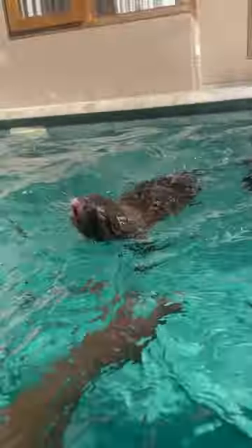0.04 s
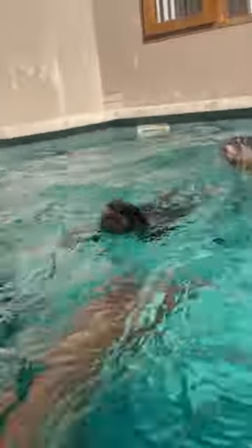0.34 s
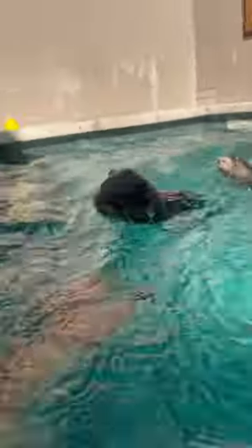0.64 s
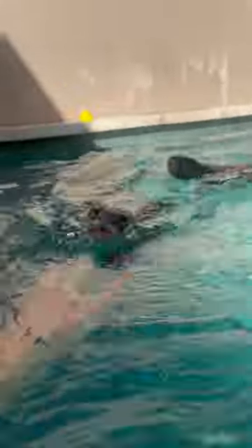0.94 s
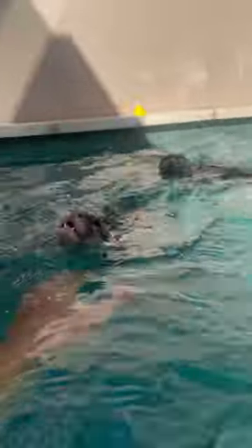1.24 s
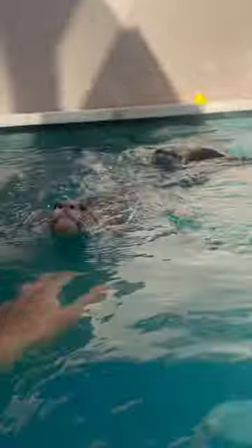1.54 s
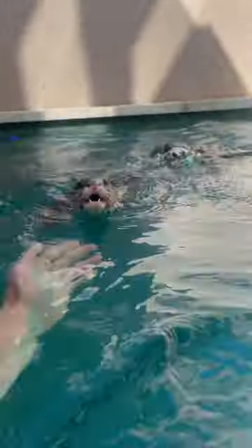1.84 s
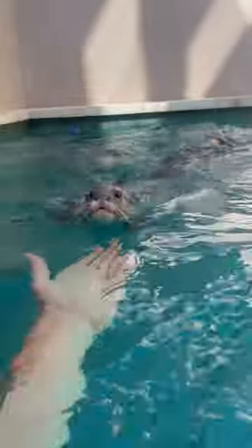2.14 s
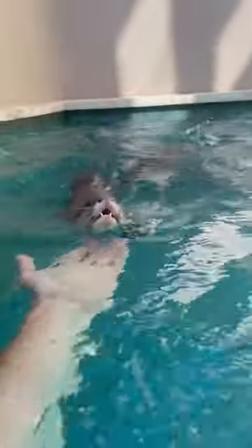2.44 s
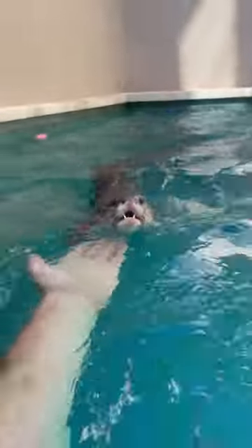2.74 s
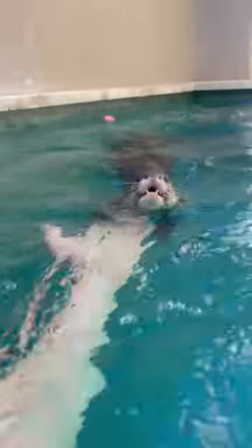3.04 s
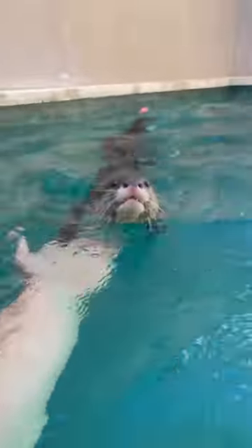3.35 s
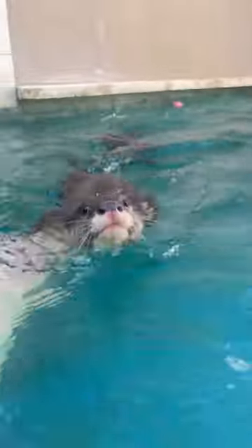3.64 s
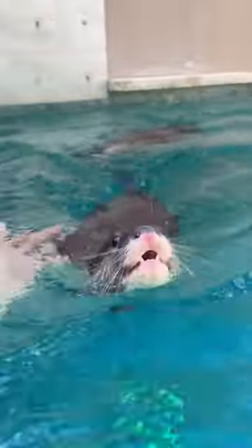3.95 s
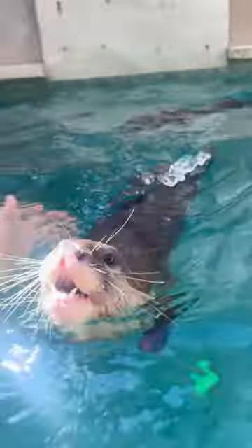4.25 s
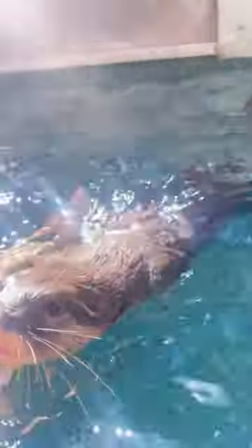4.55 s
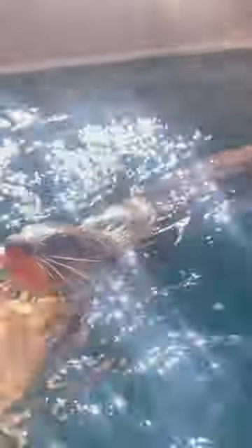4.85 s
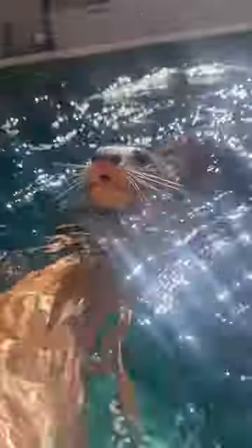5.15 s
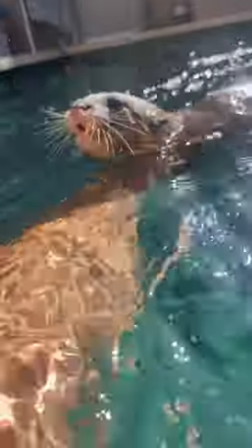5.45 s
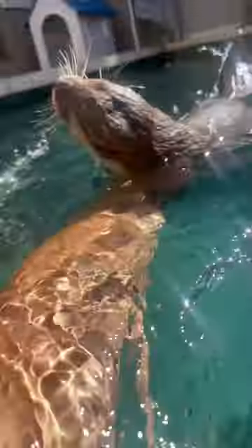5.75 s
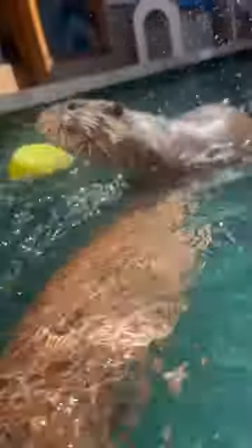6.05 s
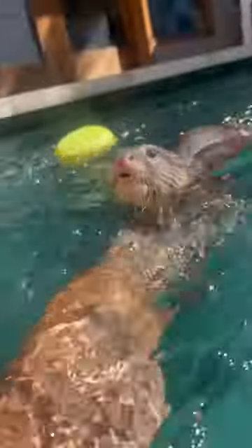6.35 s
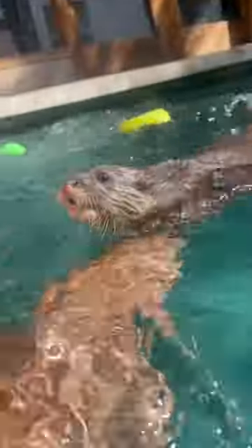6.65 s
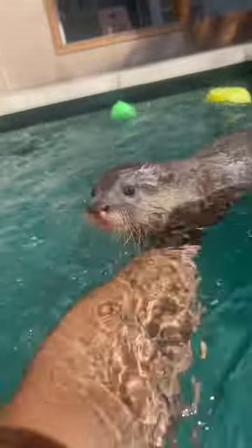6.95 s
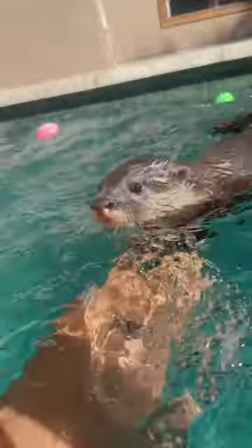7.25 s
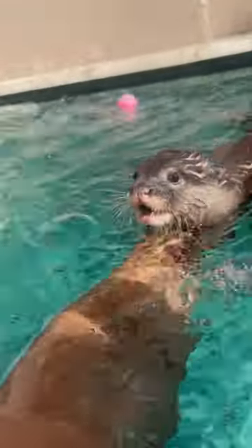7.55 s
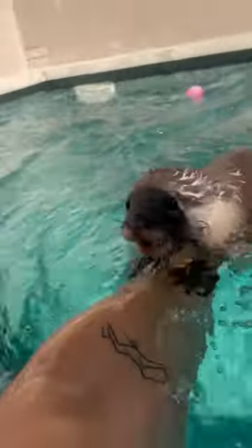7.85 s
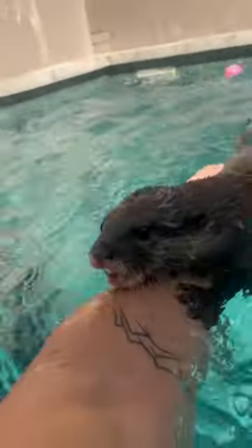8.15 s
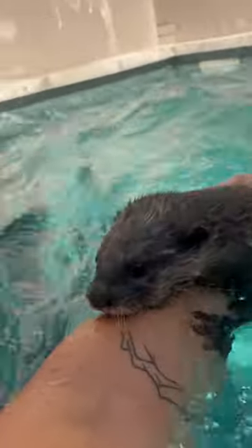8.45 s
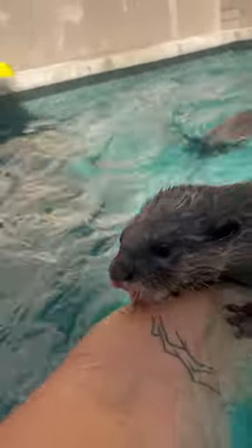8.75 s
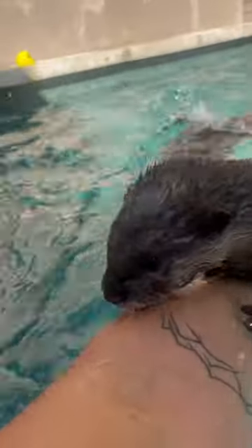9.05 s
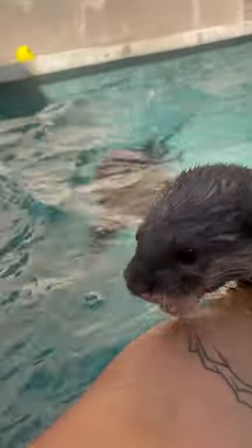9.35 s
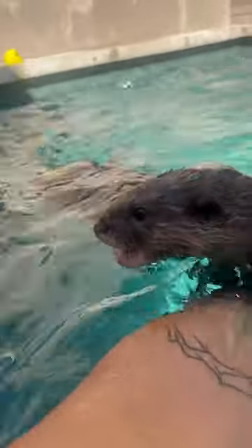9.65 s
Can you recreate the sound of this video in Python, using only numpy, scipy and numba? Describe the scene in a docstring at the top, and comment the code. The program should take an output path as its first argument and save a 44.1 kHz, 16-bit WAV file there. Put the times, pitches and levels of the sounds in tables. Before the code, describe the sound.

An otter gives repeated loud, nasal wails and harsh squeals close by in a pool, with faint lapping and drips between calls.

```python
"""An otter begs close by in a walled swimming pool. One wail is just ending; water laps, bubbles and drips,
and a second wail follows, its vocal-fold pulses ringing the resonances of the throat. A faint hum comes
and goes. Five more calls each leap up into a whistle, break down into a nasal wail near 750 Hz and fray
into a harsh scream as the folds lose their rhythm; squeals burst from the third. Spray fizzes up toward
the end. Throughout, the moving water and the walls reflect the sound."""
import sys
import numpy as np
from scipy import signal
from scipy.fft import rfft, irfft, next_fast_len
from scipy.io import wavfile
from scipy.ndimage import uniform_filter1d, map_coordinates
from numba import njit

SR = 44100
rng = np.random.default_rng(int(sys.argv[2]) if len(sys.argv) > 2 else 0)


def transcribe(u):
    """Save the signal u as a 16-bit wav file named by the first command-line argument.

    u: samples, shape (n,) or (channels, n), limited to [-1, 1]; the rate is SR.
    q: integer samples, one column per channel.
    """
    v = np.clip(np.atleast_2d(u).T, -1, 1)
    q = np.round(v * 32767).astype(np.int16)
    wavfile.write(sys.argv[1], SR, q)


N = 427769
T = np.arange(N) / SR
CUTOFF_HZ = 15800


def from_db(db):
    """Decibels to amplitude ratio."""
    return 10 ** (np.asarray(db) / 20)


def rms_one(x):
    """Normalisation to rms 1."""
    return x / np.sqrt(np.mean(x ** 2) + 1e-20)


def evened(x, span_s=0.017):
    """Envelope division: holds the short-term rms at 1, keeping the grain."""
    size = max(int(span_s * SR), 8)
    power = uniform_filter1d(uniform_filter1d(x * x, size), size)
    return x / np.sqrt(np.abs(power) + 1e-12)


def in_time(rows):
    """Linear interpolation of a table's columns at every sample."""
    s, *columns = np.transpose(sorted(map(tuple, rows)))
    return [np.interp(T, s, c) for c in columns]


def at_hz(points, hz):
    """Interpolation of a spectrum on a log-frequency axis."""
    f, value = np.transpose(points)
    return np.interp(np.log(np.maximum(hz, 1)), np.log(f), value)


def gate(start, end, attack_s, release_s):
    """Trapezoidal envelope: 1 from start to end, fading to 0 around it."""
    return np.clip(np.minimum((T - start) / attack_s, (end - T) / release_s) + 1, 0, 1)


def swell(s, half_s, squareness=4):
    """Super-Gaussian envelope: a rounded hump of height 1 around a moment."""
    return np.exp(-np.minimum(np.abs(T - s) / half_s, 6) ** squareness)


def cut(x, hz, kind, order=2):
    """Butterworth filter."""
    sections = signal.butter(order, np.minimum(hz, SR / 2 - 1), kind, fs=SR, output="sos")
    return signal.sosfilt(sections, x)


def drift(rate):
    """Smooth random modulation of rms 1, changing `rate` times a second."""
    return rms_one(map_coordinates(rng.standard_normal(N // 10), [T * rate], order=2, mode="wrap"))


@njit
def two_pole(x, a1, a2):
    """The difference equation of a damped resonator."""
    y = np.zeros(len(x))
    for i in range(2, len(x)):
        y[i] = (1 - a2) / 2 * (x[i] - x[i - 2]) + a1[i] * y[i - 1] - a2 * y[i - 2]
    return y


def resonate(x, hz, width_hz):
    """Band-pass resonance with peak gain 1; hz may move."""
    r = np.exp(-np.pi * width_hz / SR)
    return two_pole(x, 2 * r * np.cos(2 * np.pi * hz / SR) * np.ones(N), r * r)


def formant(x, modes, wander=0.012):
    """Parallel resonances (centre Hz, width Hz, dB) wander as tongue and lips move; even level."""
    return evened(sum(from_db(db) * resonate(x, hz * (1 + wander * drift(9)), width)
                      for hz, width, db in modes))


def folds(pitch, rough, quiver, jitter=0.16, shimmer_db=-1.0, graze_db=-11, rasp=0.54, puff_s=0.0011):
    """Glottal source: a pulse per closure, with jitter, shimmer and hiss when rough; and a sine swing."""
    wobble = 1 + 0.00347 * drift(110) + rough * 0.035 * drift(90) + quiver * drift(36)
    cycles = np.cumsum(pitch * wobble) / SR
    samples = np.arange(N)
    closures = np.interp(np.arange(1, int(cycles[-1])), cycles, samples)
    wild = np.interp(closures, samples, rough)
    period = SR / np.interp(closures, samples, pitch)
    slip, shimmer = rng.standard_normal((2, len(closures)))
    closures = np.clip(closures + jitter * wild ** 2 * slip * period, 10, N - 10)
    grazes = rng.random(len(closures)) < 0.7 * (wild - 0.2)   # below 0.2 the folds always close fully
    force = from_db(shimmer_db * wild * np.minimum(shimmer, 1) + graze_db * grazes)
    pulses = np.zeros(N)
    for tap in range(-8, 9):   # a windowed sinc places each pulse between samples
        index = closures.astype(int) + tap
        offset = index - closures
        np.add.at(pulses, index, force * np.sinc(offset) * np.cos(offset * np.pi / 18) ** 2)
    puffs = signal.lfilter([1], [1, -np.exp(-1 / (puff_s * SR))], pulses)
    hiss = rasp * rough * evened(puffs * rng.standard_normal(N))
    return evened(pulses) + hiss, np.sqrt(2) * np.sin(2 * np.pi * cycles)


# Short rasps within wails. Each row: centre and half-length in seconds, roughness from 0 to 1.
WAIL_RASPS = [(1.005, 0.04, 0.7), (1.102, 0.011, 0.6), (1.192, 0.018, 0.6), (1.353, 0.02, 0.5),
              (4.135, .025, .32), (4.39, .03, .95), (7.83, .03, .7)]


def roughness(fray_at, clear, frayed, squeal, squeal_rough, fray_s=0.047, break_rough=0.22, flip=0.443):
    """Aperiodic vibration: a wail holds its tone, then frays; half-rough folds flip from tone to rasp."""
    rough = clear + (frayed - clear) * np.clip((T - fray_at) / fray_s + .5, 0, 1)
    rasps = [amount * swell(s, half_s) for s, half_s, amount in WAIL_RASPS]
    rough = np.max([rough, break_rough * np.sqrt(after_break()), *rasps], axis=0)
    rough = np.clip(rough + (squeal_rough - rough) * squeal, 0, 1)
    return np.clip(rough + flip * rough * (1 - rough) * drift(24), 0, 1)


# Throat shapes. Each row: time in seconds, second resonance in Hz and its level in dB, third resonance
# in Hz and its level in dB, fourth resonance in Hz, chest level in dB, nose level in dB (all relative).
THROAT_SHAPES = [(0.04, 3900, -2.5, 6600, -1.5, 9900, -18, -21),
                 (0.55, 3880, 13, 6800, 11.5, 10900, -5.5, 4),
                 (1.15, 4150, -9.5, 6950, -7.5, 9130, -15.5, -12),
                 (2.0, 4360, 2.5, 6250, -8, 9800, -16.5, -16), (2.25, 3600, 6.5, 6300, 3, 10960, -23, 1.5),
                 (2.65, 4240, 0.5, 6540, -9.5, 9300, -19, -16), (3.05, 4200, 5, 6300, 2, 8500, -12, -8.5),
                 (3.27, 3645, -10, 6900, -2.5, 8640, -13.5, -19.5),
                 (4.09, 3850, -7, 6760, -3, 10600, -8, -9), (4.19, 4530, -19, 6440, 5.5, 9350, -8.5, -13),
                 (4.25, 4260, -37, 6700, 2.5, 9400, -10.5, -14),
                 (4.45, 4160, -5, 6500, 1.5, 10140, -5.5, -7),
                 (5.55, 4870, -7, 6980, -3.5, 9830, -19.5, -18),
                 (5.88, 4140, 3, 7300, -7.5, 9100, -20.5, -17), (6.4, 3820, -7.5, 6630, -6, 9000, -11, -11),
                 (7.7, 4670, -24, 7214, 11, 10490, -11, -3), (8.05, 5060, 4.5, 6750, 0, 9860, -15, -10.5),
                 (8.6, 5176, 5.5, 6700, -1, 10100, -20.5, -21.5), (8.72, 5040, 21, 6370, 15, 9850, -4, 6),
                 (8.98, 4640, 23, 6070, 23.5, 9800, -3, 6.5), (9.15, 5060, 4.5, 6320, 4, 10030, -22, -21.5),
                 (9.45, 5600, 5.5, 6800, 1.5, 9950, -24, -10), (9.62, 5060, -8, 6150, 1.5, 9500, -18, -14)]
# The double fourth resonance. Each row: ratio to its centre frequency, width in Hz, relative level in dB.
FOURTH_MODES = [(1.001, 900, 0), (1.12, 1500, -1.5)]


def throat(source, airy, swing, jaw_hz, first_db, effort_db, bright_db, first_width_hz=370, treble_db=4):
    """Formant filtering: throat and nose ring over a chest tone; effort lifts resonances two and three."""
    second_hz, second_db, third_hz, third_db, fourth_hz, chest_db, nose_db = in_time(THROAT_SHAPES)
    open_db = 1.22 * (effort_db + 26)   # the usual effort is -26 dB
    peak_and_shoulder = [(jaw_hz, first_width_hz, 0), (0.85 * jaw_hz, 4.5 * first_width_hz, -15)]
    first = from_db(first_db) * formant(source, peak_and_shoulder)
    second = from_db(second_db + open_db) * formant(source, [(second_hz, 940, 0)])
    third = from_db(third_db + open_db) * formant(airy, [(third_hz, 710, 0)])
    nose = from_db(nose_db) * formant(source, [(1330, 1300, 0)])
    mouth = first - second - third + nose   # the upper resonances swing against the first
    # a valley between the first two resonances deepens as the second climbs
    valley_depth = np.clip((second_hz - 3970) / 900, 0, .9)
    mouth = mouth - valley_depth * resonate(mouth, hz=3386, width_hz=1300)
    hollow = resonate(mouth, 0.69 * jaw_hz, width_hz=330)   # side cavities swallow this band
    core = evened(mouth - hollow + from_db(chest_db) * swing)
    fourth = formant(airy, [(ratio * fourth_hz, width, db) for ratio, width, db in FOURTH_MODES])
    treble = np.minimum(from_db(bright_db), .92)
    return np.sqrt(1 - treble ** 2) * core - from_db(treble_db) * treble * fourth


# The wails. Each row: start, end and moment of fraying in seconds, roughness from 0 to 1 before and
# after that moment, quiver as a share of the pitch.
WAIL_SPANS = [(0, 0.075, 0.014, 0.3, 0.15, .005), (0.419, 1.36, 1.2, 0.11, 0.15, .008),
              (1.878, 3.274, 2.85, 0.09, 0.72, .004), (3.853, 4.637, 4.23, .12, 0.7, .01),
              (5.335, 6, 5.48, .26, 0.62, .02), (6.01, 6.739, 6.4, 0.74, 0.78, .03),
              (7.48, 8.202, 7.92, .4, 0.79, .022), (8.56, 9.701, 9.04, 0.29, 0.78, .022)]
# Pitch on which the voice settles, one list per call. Each row: time in seconds, pitch in Hz.
WAIL_PITCH = [
    [(0, 818), (.075, 775.5)],
    [(0.42, 907.2), (0.48, 832.4), (0.582, 821), (0.686, 755.6), (0.874, 751.4), (0.958, 803.6),
     (0.976, 844.6), (1.086, 826), (1.094, 795.2), (1.192, 788.6), (1.2, 820.5), (1.244, 785.4),
     (1.346, 797.8), (1.36, 839.2)],
    [(2.12, 746), (2.19, 726.1), (2.23, 749.5), (2.32, 738), (2.4, 793), (2.44, 739), (2.48, 767.3),
     (2.58, 744), (2.65, 785.7), (2.73, 746.7), (2.83, 772), (3.28, 773.2)],
    [(3.85, 692.3), (4.07, 694.7), (4.3, 765.4), (4.635, 733)],
    [(5.35, 700.6), (5.75, 770.6), (5.97, 830.4), (6.09, 603.2), (6.74, 618.5)],
    [(7.57, 679.4), (7.66, 694.7), (8.205, 668.2)],
    [(8.62, 642.8), (8.65, 718.5), (8.73, 662.4), (8.76, 706), (8.87, 655.6), (8.92, 698), (8.95, 641.5),
     (9.02, 629), (9.7, 711.4)],
]
# Effort and mouth opening, one list per wail after the first. Each row: time in seconds, effort in dB,
# first resonance in Hz, relative treble level in dB.
WAIL_COURSE = [
    [(0.42, -34, 2220, -10), (0.478, -40, 2710, -4), (0.744, -29.5, 2170, -1), (0.798, -30, 2480, 8),
     (0.864, -32.5, 2200, -8.5), (0.954, -25, 2640, -14.5), (1.0, -30.5, 2130, -14),
     (1.06, -27.5, 2800, -7.5), (1.118, -28, 2350, -5.5), (1.308, -25, 2480, -1), (1.355, -26, 2400, -9.5)],
    [(1.88, -24, 2450, -6), (1.914, -25, 2850, -4), (2.038, -29, 2330, 1), (2.154, -32, 2420, -13.5),
     (2.25, -27.5, 2260, -7.5), (2.366, -30.5, 2660, -10.5), (2.428, -24, 2270, -14),
     (2.638, -23.5, 2630, -4.5), (2.912, -26.5, 2330, -17.5), (3.142, -24, 2400, -10.5),
     (3.27, -27, 2450, -5)],
    [(3.86, -29, 1840, -2), (3.888, -27.5, 2040, -1.5), (3.962, -29, 2130, -6.5), (4.074, -27, 2330, 0.5),
     (4.144, -23.5, 2220, -11), (4.2, -18.5, 2420, -7.5), (4.22, -25, 2320, -8), (4.272, -22, 2600, -5.5),
     (4.372, -31.5, 2160, -5.5), (4.442, -26, 2110, -1.5), (4.625, -33.5, 2030, -8)],
    [(5.35, -29.5, 2210, -9), (5.41, -36, 2600, -6), (5.506, -29.5, 2600, -5.5), (5.644, -27.5, 2900, -7),
     (5.7, -32, 3080, -4)],
    [(6.03, -33, 2880, -6), (6.066, -36.5, 2800, -7), (6.096, -30.5, 2750, -14.5), (6.208, -27, 2390, -10),
     (6.44, -28, 2380, -8.5), (6.552, -32.5, 2310, -13), (6.598, -28, 2480, -16), (6.73, -32, 2400, -10.5)],
    [(7.49, -31.5, 2550, -2), (7.568, -40, 2666, -3), (7.644, -32.5, 2800, -0.5), (7.852, -28, 2590, -3),
     (7.91, -25.5, 2766, -0.5), (7.952, -33.5, 2380, -9), (7.978, -26.5, 2430, -2),
     (8.022, -29.5, 2470, -10.5), (8.092, -25.5, 2653, -7.5), (8.136, -31.5, 2522, -10),
     (8.195, -27, 2510, -7.5)],
    [(8.57, -24, 2680, -11), (8.6, -29, 2590, -8), (8.652, -33.5, 2714, -5), (8.76, -24.5, 2770, -6.5),
     (8.996, -35, 2573, -10), (9.106, -26.5, 2540, -12), (9.32, -23.5, 2600, -15.5),
     (9.478, -24.5, 2720, -7.5), (9.53, -24.5, 2640, -17), (9.618, -28.5, 2503, -3.5),
     (9.68, -22, 2675, -4.5)],
]


def wail(break_hz=1186.5, snarl_db=3, air_db=-17, level_db=0.5, throb_db=-0.36, fade_s=0.011):
    """Source and filter: fold pulses excite the throat; a rough voice hisses, snarls and throbs."""
    fray_at, clear, frayed, quiver = in_time(
        [(s, *settings) for start, end, *settings in WAIL_SPANS for s in (start, end)])
    opening = (WAIL_SPANS[0][1], -29.5, 2600, -9)   # the course row of the first wail
    effort_db, jaw_hz, bright_db = in_time([opening] + [row for rows in WAIL_COURSE for row in rows])
    held_hz, = in_time([row for rows in WAIL_PITCH for row in rows])
    squeal, squeal_db, squeal_pitch, squeal_hz, squeal_rough = squeals()
    rough = roughness(fray_at, clear, frayed, squeal, squeal_rough)
    pitch = held_hz + (break_hz - held_hz) * after_break() + (squeal_pitch - held_hz) * squeal
    pulses, swing = folds(pitch, rough, quiver)
    source = ripples(pulses)
    airy = source + from_db(air_db) * rough * rng.standard_normal(N)
    jaw_hz = jaw_hz + (squeal_hz - jaw_hz) * squeal
    first_db = 0.5 * squeal + snarl_db * rough
    voice = throat(source, airy, swing, jaw_hz, first_db, effort_db, bright_db)
    gain = from_db(level_db + effort_db + squeal * squeal_db + throb_db * rough * drift(170))
    sounding = np.max([gate(start, end, fade_s, fade_s) for start, end, *_ in WAIL_SPANS], axis=0)
    return cut(voice, 620, "high", order=4) * gain * sounding


def bubble_cloud(per_s, low_hz, high_hz, sharpness, spread_db):
    """Poisson excitation: small bubbles of 20 sizes ring at random moments; rms 1."""
    born = rng.random(N) < per_s / SR
    clicks = born * from_db(spread_db * np.minimum(rng.exponential(1, N), 4)) * rng.choice([-1, 1], N)
    size = rng.integers(0, 20, N)
    cloud = np.zeros(N)
    for k, hz in enumerate(np.geomspace(low_hz, high_hz, 20)):
        kicks = clicks * (size == k) + 1e-12 * (k + 1) * np.cos(T)   # the tiny term prevents underflow
        cloud += resonate(kicks, hz, hz / sharpness) / hz ** 0.19
    return rms_one(cloud)


# Spectrum of the wash. Each row: frequency in Hz, relative spectral density in dB.
WASH_SPECTRUM = [(25, -44), (55, 1), (95, -4), (170, 1), (350, -5.5), (600, -16), (2200, -20.5),
                 (4500, -37), (11000, -27), (13500, -14)]
# Low wash, stirred water and fine spray. Each row: time in seconds, relative level in dB.
WASH_LEVEL = [(0.0, -60.5), (3.21, -59.5), (7.05, -54), (9.32, -58)]
SLOSH_LEVEL = [(0, -54.5), (4.08, -65.5), (4.43, -44), (4.7, -58), (5.25, -38.5), (6.2, -55), (6.75, -51.5),
               (7.15, -57.5), (8.3, -64.5), (9.7, -49)]
SPRAY_LEVEL = [(0, -49.5), (3.6, -90.5), (5.1, -45.5), (6.9, -101), (9.7, -28)]


def lapping(wash_db=4.5, gurgle_db=-5, spray_db=-6, width=0.088):
    """Shaped noise and bubble resonance: a dull wash, low gurgles and a fizz of spray; mid and side."""
    size = next_fast_len(N)
    hz = np.fft.rfftfreq(size, 1 / SR)
    spectrum = rfft(rng.standard_normal((2, size))) * from_db(at_hz(WASH_SPECTRUM, hz)) * (hz > 20)
    mid, side = rms_one(irfft(spectrum, size)[:, :N])
    wash = from_db(wash_db + in_time(WASH_LEVEL)[0] + 2.0 * drift(22))
    slosh = from_db(gurgle_db + in_time(SLOSH_LEVEL)[0])
    spray = from_db(spray_db + in_time(SPRAY_LEVEL)[0])
    gurgle = slosh * bubble_cloud(300, low_hz=300, high_hz=1074, sharpness=14, spread_db=4.5)
    fizz = spray * bubble_cloud(900, low_hz=1000, high_hz=15000, sharpness=7, spread_db=4)
    return wash * mid + gurgle + fizz, width * wash * cut(side, 150, "high", order=1)


# Single bubbles and drips. Each row: start in seconds, relative level in dB, starting pitch in Hz.
BUBBLES = [(0.305, -45.5, 915), (1.672, -39.5, 1085), (3.302, -30, 696), (3.46, -47, 458),
           (3.739, -47, 1660), (4.359, -44, 724), (5.199, -39, 434), (6.871, -38, 1260),
           (7.265, -47, 784.3)]


def plops(ring_cycles=22, rise=0.052, level_db=-1):
    """Damped oscillation: a bubble rings and climbs in pitch as it nears the surface."""
    out = np.zeros(N)
    for s, db, hz in BUBBLES:
        start = int(s * SR)
        age = T[:min(SR // 4, N - start)] * hz / ring_cycles
        envelope = from_db(db + level_db) * (1 - np.exp(-20 * age)) * np.exp(-1.6 * age)
        phase = 2 * np.pi * ring_cycles * (age + rise * age ** 2 / 2)
        out[start:start + len(age)] += envelope * np.sin(phase)
    return out


# Droplets slapping the surface. Each row: start in seconds, relative level in dB.
DROPLETS = [(0.3563, -37), (3.46, -34), (3.739, -45.5), (4.992, -26), (5.0752, -31.5), (5.226, -22),
            (6.8708, -31)]


def drops(decay_s=0.0026, level_db=-7):
    """Impact noise: each droplet is a bright tick that decays exponentially."""
    hits = np.zeros(N)
    for s, db in DROPLETS:
        hits[int(s * SR)] = from_db(db + level_db)
    envelope = signal.lfilter([1], [1, -np.exp(-1 / (decay_s * SR))], hits + 1e-18)
    return cut(envelope * rng.standard_normal(N), 1500, "high")


# Faint low hums. Each row: start and end in seconds, frequency in Hz, level in dB.
LOW_HUMS = [(1.483, 2.84, 90.5, -62), (6.901, 8.293, 161.4, -57.5)]


def hums(fade_s=0.14, waver=.015):
    """Slow frequency modulation: low tones waver behind the water."""
    out = np.zeros(N)
    for start, end, hz, db in LOW_HUMS:
        phase = 2 * np.pi * np.cumsum(hz * (1 + waver * drift(2.6))) / SR
        out += from_db(db) * gate(start, end, fade_s, fade_s) * np.sin(phase)
    return out


# Yelps that open calls. Each row: start, top, end and half-width of the pitch arch in seconds, foot and
# top pitch in Hz, first and last relative level in dB, settling time of the following wail in seconds.
YELP_ARCHES = [(1.765, 1.795, 1.873, .047, 3000, 6700, -33, -25, .054),
               (3.792, 3.835, 3.851, .027, 2600, 3050, -38, -29, .036),
               (5.27, 5.325, 5.344, .024, 2250, 3350, -30, -31, .018),
               (7.349, 7.419, 7.48, .033, 2500, 6500, -29, -25.5, .02),
               (8.466, 8.529, 8.565, .022, 2250, 4350, -31, -26, .02)]
# Cracks down an octave. Each row: start and end in seconds, relative amplitude of the subharmonics.
GRUFF_SPANS = [(1.824, 1.873, .12), (3.799, 3.82, .9), (5.269, 5.312, .6), (7.349, 7.378, .45),
               (8.459, 8.504, .5)]


def yelp_controls(scoop=.08, scoop_s=.012, gruff_sag=.05, pure_doubling=0.01, crack_s=0.0036):
    """Register jumps: a yelp scoops up, arches and droops; the folds flail briefly at each jump."""
    pitch, gain = np.zeros((2, N))
    for start, top, end, half_s, foot_hz, top_hz, first_db, last_db, _ in YELP_ARCHES:
        on = gate(start, end, attack_s=.012, release_s=0.0033)
        arch_hz = foot_hz + (top_hz - foot_hz) * swell(top, half_s, squareness=2.4)
        slack = np.exp(-np.clip(np.minimum(T - start, end - T) / scoop_s, -.35, 20))
        pitch += (on > 0) * arch_hz * (1 - scoop * slack)
        gain += on ** 2 * from_db(np.interp(T, [start, end], [first_db, last_db]))
    doubling = sum(share * gate(start, end, crack_s / 2, crack_s / 2) for start, end, share in GRUFF_SPANS)
    jumps = [s for start, end, _ in GRUFF_SPANS for s in (start, end)]
    jumps += [end for _, _, end, *_ in YELP_ARCHES]
    crack = np.max([gate(s, s, crack_s, crack_s) for s in jumps], axis=0)
    return pitch * (1 - gruff_sag * (doubling > 0)), gain, pure_doubling + doubling, crack


def yelp(flutter=0.014, crack_flutter=0.082, hiss_db=-22, crack_hiss_db=-7, shake_db=1.5, level_db=6.0):
    """Whistle register: a few harmonics, with subharmonics between them where the period doubles."""
    # Each pair: frequency in Hz, gain in dB.
    colour = [(900, -6.5), (1500, -9.5), (2400, 0.5), (3500, -0.5), (5000, -3),
              (6400, 9), (8000, -0.5), (10500, 8), (12500, 5.5), (15000, -13.5)]
    pitch, gain, doubling, crack = yelp_controls()
    live = gain > 0
    wobble = 1 + (flutter + crack_flutter * crack) * drift(700)
    phase = (2 * np.pi * np.cumsum(pitch * wobble) / SR)[live]
    tone = np.zeros(N)
    for ratio in np.arange(1, 25) / 2:
        hz = ratio * pitch[live]
        amplitude = from_db(at_hz(colour, hz)) * ratio ** -.4 * (hz < CUTOFF_HZ)
        share = doubling[live] if ratio % 1 else 1
        tone[live] += amplitude * share * np.sin(ratio * phase + rng.uniform(0, 2 * np.pi))
    hiss = rms_one(cut(rng.standard_normal(N), [2500, 12000], "band"))
    hiss *= from_db(hiss_db) + from_db(crack_hiss_db) * crack
    whistle = evened(ripples(tone), span_s=0.0086) * from_db(shake_db * drift(250))
    return (whistle + hiss) * from_db(level_db) * gain


def after_break():
    """Exponential relaxation: 1 as a yelp breaks into its wail, dying away as the voice settles."""
    return sum((T > start) * np.exp(-np.clip((T - end) / settle_s, 0, 30))
               for start, _, end, *_, settle_s in YELP_ARCHES)


# Squeals that burst out of a scream. Each row: centre and half-length in seconds, gain in dB, pitch
# in Hz, first resonance in Hz, roughness from 0 to 1.
SQUEAL_BURSTS = [(5.744, 0.02, 6, 754.4, 4044, 0.34), (5.837, 0.014, 11.5, 995, 3240, 0.8),
                 (5.855, 0.0066, 18, 869.3, 3574, 0.4), (5.874, 0.009, 13, 884.6, 3520, 0.64),
                 (5.896, 0.0162, 8, 829.4, 3323, .4), (5.969, 0.016, 10, 1132, 4680, 0.56)]


def squeals():
    """Crossfade: how far a squeal has taken over (0-1), then its gain, pitch, resonance and roughness."""
    humps = np.array([swell(s, half_s) for s, half_s, *_ in SQUEAL_BURSTS])
    total = humps.sum(axis=0)
    settings = np.array(SQUEAL_BURSTS)[:, 2:].T @ humps / (total + 1e-12)
    return np.minimum(total, 1), *settings


def ripples(x, delays_s=(.0007, .0031), gain=0.4, sway=0.2274):
    """Comb filtering: reflections off the moving water interfere with x in slowly sliding notches."""
    moving_s = [delay + sway * delays_s[0] * drift(4) for delay in delays_s]
    return x + sum(gain * map_coordinates(x, [(T - delay) * SR], order=3) for delay in moving_s)


def walls(x, echo_db=-21, tail_db=-22, dull_hz=7000, t60_s=0.67):
    """Reverberation: the walls return three early echoes and a dull tail that differs at each ear."""
    t = T[:int(.7 * SR)]
    envelope = from_db(-60 * t / t60_s) * np.minimum(t / 0.004, 1)
    tail = cut(rng.standard_normal((2, len(t))), dull_hz, "low") * envelope
    response = from_db(tail_db) * tail / np.sqrt(np.sum(tail ** 2) / 2)
    for delay_s, gain in [(.0093, 0.42), (.0185, 0.99), (.031, 0.97)]:
        response[:, int(delay_s * SR)] += gain * from_db(echo_db)
    return signal.fftconvolve(x[None], response, axes=1)[:, :N]


# Phase between the microphone ports. Each row: frequency in Hz, lead of the left port in radians.
LEFT_LEAD = [(150, 0), (600, 0.8), (1400, 0.35), (2800, 0.35), (5600, -1.18), (9500, -1.43), (12500, -2.3)]


def ports(x):
    """Phase difference: two microphone ports hear the sound with an offset that depends on frequency."""
    size = next_fast_len(N + 1000)
    lead = at_hz(LEFT_LEAD, np.fft.rfftfreq(size, 1 / SR))
    return irfft(rfft(x, size) * np.exp(.5j * lead * [[1], [-1]]), size)[:, :N]


def scene(glint=0.4):
    """Superposition: otter, water and walls; each port gets its own voice reflection off the water."""
    water, water_side = lapping()
    background = water + plops() + drops() + hums()
    voice = wail() + yelp()
    at_ports = np.array([ripples(voice, delays_s=[delay_s], gain=glint) for delay_s in (.0013, .0019)])
    reverberation = walls(cut(voice + background, 250, "high"))
    return ports(at_ports / np.hypot(1, glint) + background + reverberation) + water_side * [[1], [-1]]


def record(dry, edge_hz=12100):
    """Band limiting: the microphone falls off steeply in the top treble."""
    steep_edge = signal.cheby2(20, 60, CUTOFF_HZ + 300, fs=SR, output="sos")
    return signal.sosfilt(steep_edge, cut(dry, edge_hz, "low", order=12))


dry = scene()
out = record(dry)
transcribe(out)
```